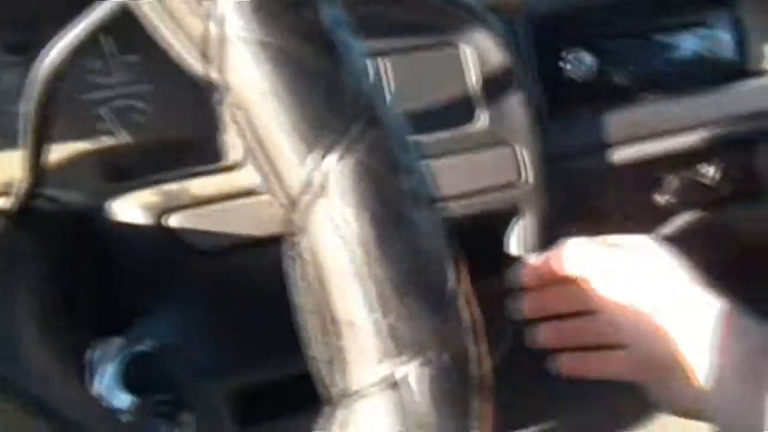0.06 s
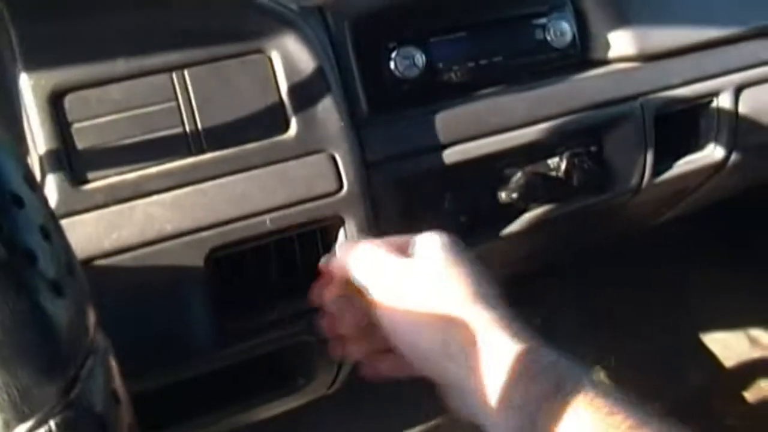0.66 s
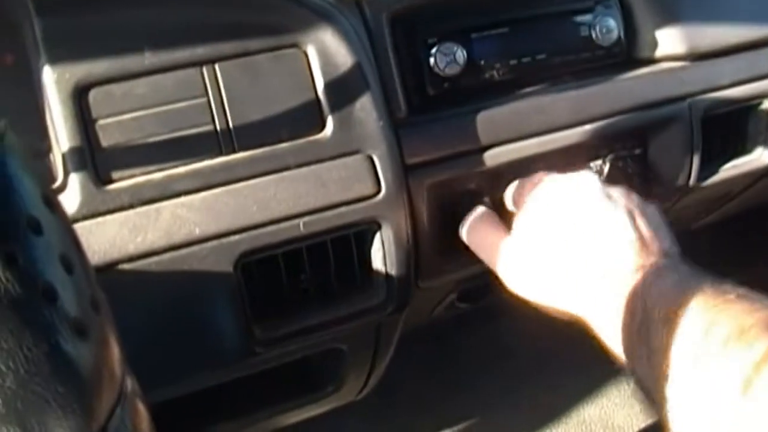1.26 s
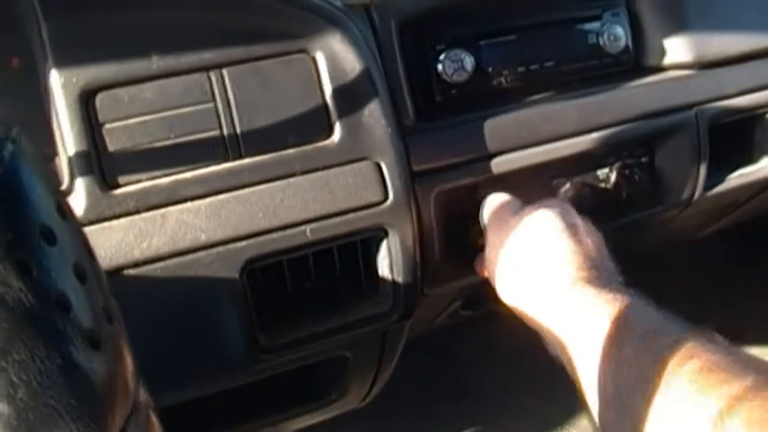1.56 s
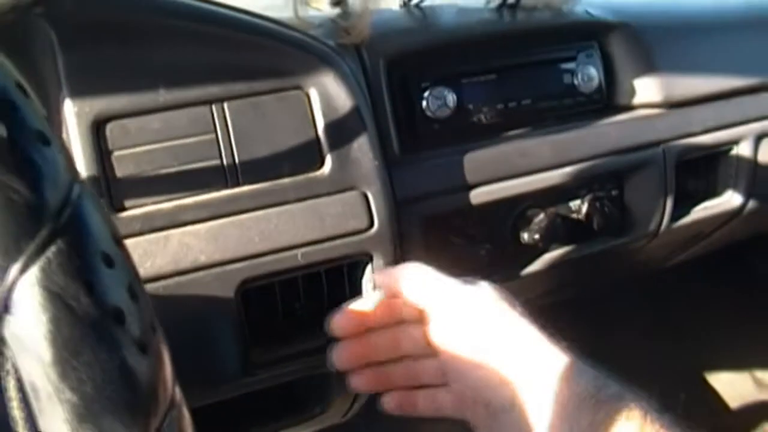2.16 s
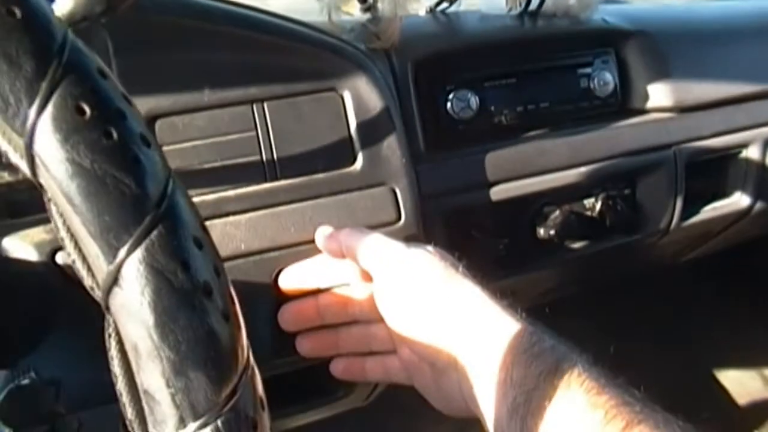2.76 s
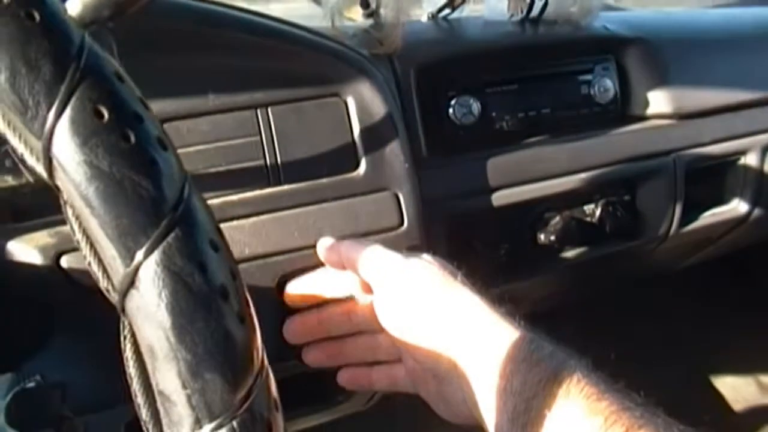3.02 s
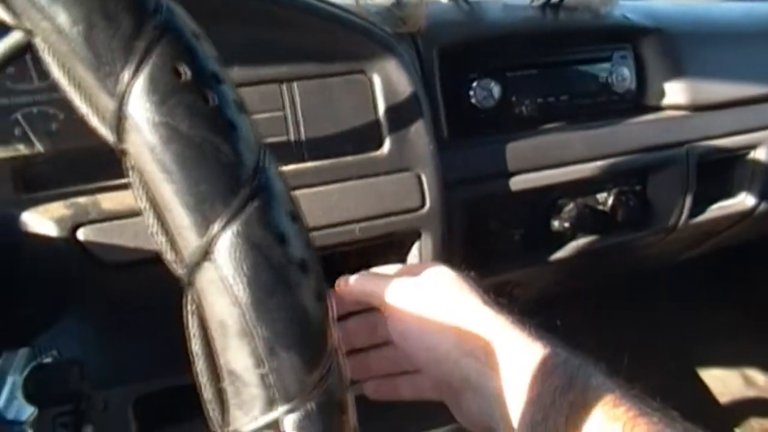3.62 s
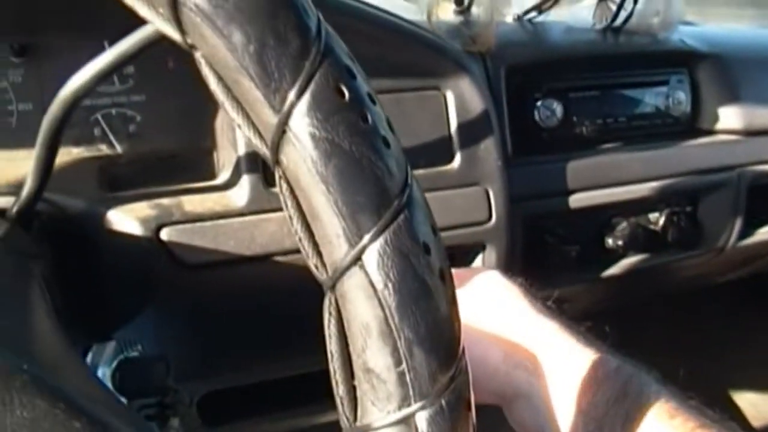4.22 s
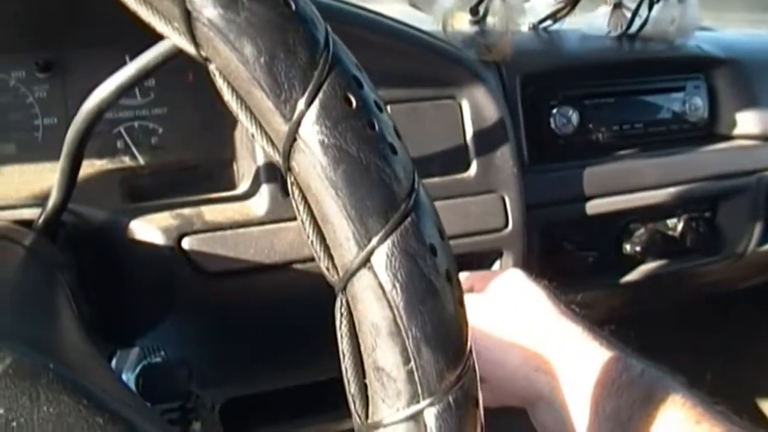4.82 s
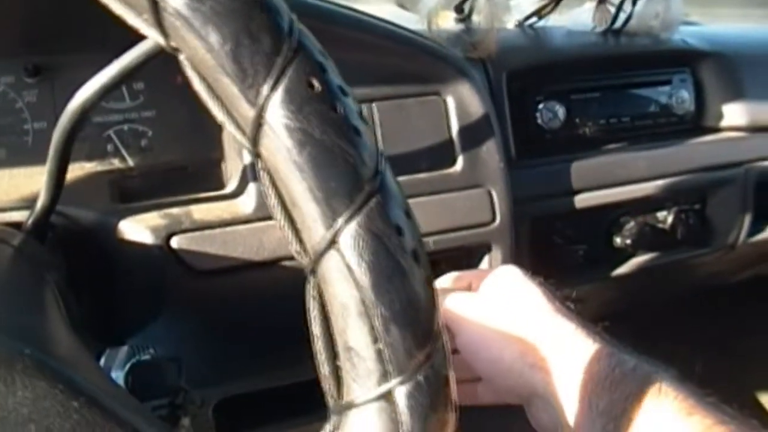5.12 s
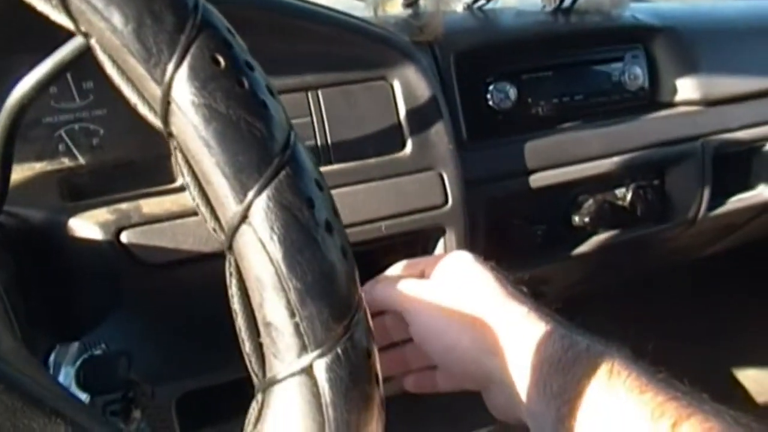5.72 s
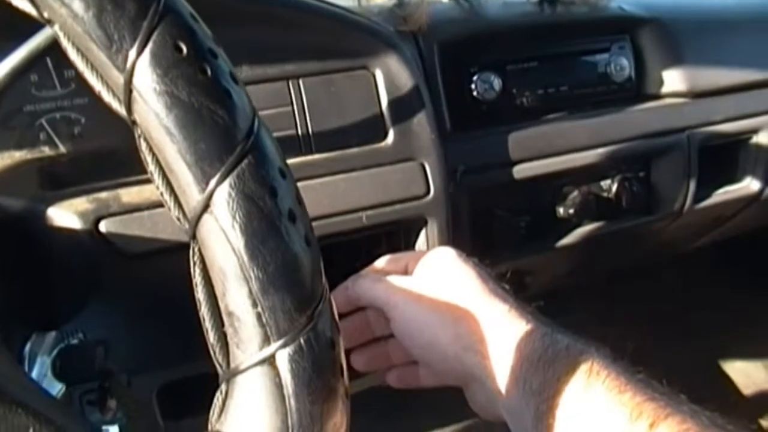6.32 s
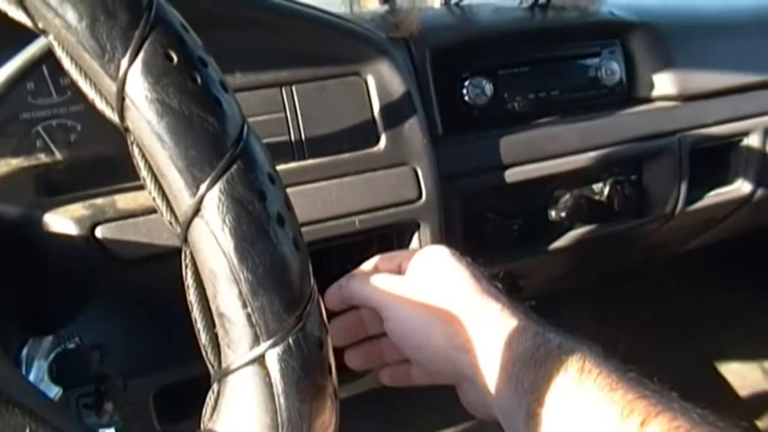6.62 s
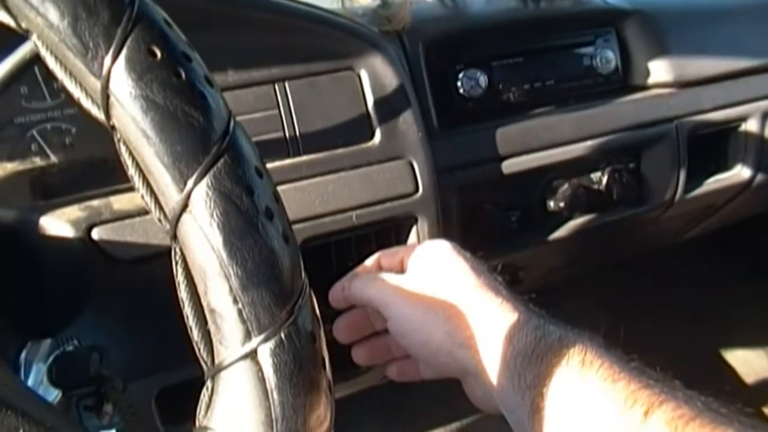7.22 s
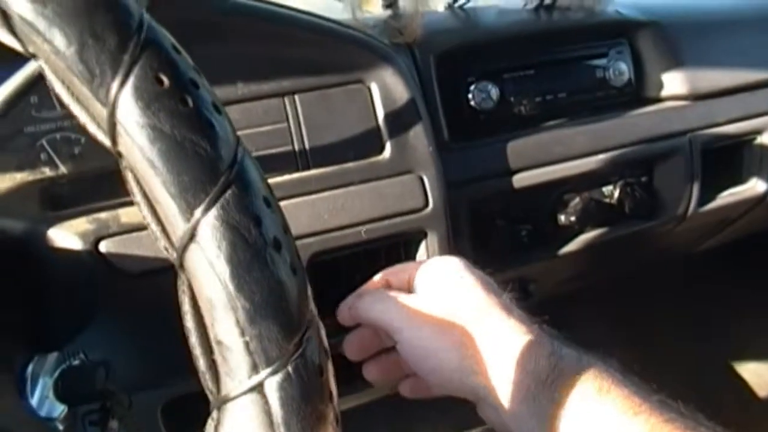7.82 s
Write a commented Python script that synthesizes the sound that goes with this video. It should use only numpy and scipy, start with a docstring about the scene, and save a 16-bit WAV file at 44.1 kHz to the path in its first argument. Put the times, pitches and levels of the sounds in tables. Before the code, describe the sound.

Inside an idling truck, a short air hiss and three quick plastic clicks start a dashboard blower, which blows steadily with faint whistles.

```python
"""In the cab of a pickup, from the driver's seat: the six-cylinder engine idles with a drone, a rumble
and one soft chuff per cycle. The heater's mode knob is turned and air hisses through a vacuum valve.
Then the fan switch clicks up three steps, and the blower spins up and rushes through the dashboard
ducts, which throb and whistle. Its electrical load pulls the idle down a little."""
import sys
import numpy as np
from scipy import signal
from scipy.fft import rfft, irfft, next_fast_len
from scipy.io import wavfile
from scipy.ndimage import uniform_filter1d, minimum_filter1d

SR = 44100
rng = np.random.default_rng(int(sys.argv[2]) if len(sys.argv) > 2 else 0)


def wrap_up_sound(samples):
    """Save the sound to the file named by the first command line argument, as 16-bit audio."""
    columns = np.atleast_2d(samples).T
    # keep every value between -1 and 1, then stretch to whole-number steps
    tamed = np.clip(columns, -1, 1)
    steps = np.round(tamed * 32767).astype(np.int16)
    wavfile.write(sys.argv[1], SR, steps)


N = 347065
TIME = np.arange(N) / SR
FFT_SIZE = next_fast_len(N + 4096)
FREQ = np.maximum(np.arange(FFT_SIZE // 2 + 1) * SR / FFT_SIZE, 1)

# how the firing tone booms with the listener's place in the cab, before scaling: time_s, swing_db
FIRING_BOOM = [(0, -2.5), (0.8, 2.5), (1.85, -2), (2.15, -2), (3.25, -12.5), (3.5, 6.5), (4.3, -1.5),
               (4.65, 1), (5.9, -6), (6.9, 4.5), (7.87, -1)]
# weaker engine tones: waves_per_cycle, level_db
ENGINE_TONES = [(3, -33.5), (5, -35.5), (10, -40.5), (12, -44), (15, -30), (17, -40.5), (18, -28),
                (20, -31.5), (27, -33.5), (56, -39), (60, -42.5)]
# engine rumble: pitch_hz, level_db_per_hz
RUMBLE_SPECTRUM = [(15, -68), (28, -41), (60, -45.5), (115, -44.5), (200, -49.5), (400, -55.5),
                   (700, -56.5), (1100, -60.5), (1700, -64), (2500, -71.5), (3300, -75.5), (5500, -77),
                   (8000, -79), (9000, -78.5), (16000, -84)]
# panels that ring with the engine: pitch_hz, width_hz, boost_db
PANEL_RESONANCES = [(177, 38, 1), (234, 6.1, 6), (372, 45, 4.5), (478, 45, 4.5), (610, 24, 1), (714, 25, 3),
                    (983, 12, 6), (1330, 31, 1), (2405, 90, 3), (3180, 90, 2.5), (3520, 350, -1.5),
                    (7570, 200, 5.5)]
# exhaust leak when fully open: pitch_hz, level_db_per_hz
CHUFF_SPECTRUM = [(400, -82), (900, -63.5), (1800, -57), (2500, -62.5), (3500, -70), (6000, -72.3),
                  (9000, -85.5), (16000, -100)]
# the leaking valve over one cycle: share_of_cycle, share_open
LEAK_OPENING = [(.11, .03), (.155, .82), (.31, .76), (.41, .1), (.6, .03)]
# faint hums of belt-driven parts: waves_per_cycle, level_db
BELT_HUMS = [(40.3, -34.5), (59.4, -47), (144.8, -48)]
# the clearest belt hum: time_s, level_db
CLEAR_HUM_LEVELS = [(0, -38), (.35, -37), (.55, -33), (1.05, -31.5), (1.35, -41), (1.65, -41), (1.9, -35),
                    (7.87, -35.5)]

# steps of the fan switch: start_s, added_share_of_full_speed
FAN_STEPS = [(1.752, .3), (1.83, .22), (1.92, .28)]
# duct roar, vent jet and grille hiss at full fan speed: pitch_hz, level_db_per_hz
ROAR_SPECTRUM = [(20, -53.5), (55, -37.5), (80, -40), (115, -39.5), (200, -39.5), (260, -41.5),
                 (330, -42.5), (400, -47.5), (700, -58.5), (1500, -96)]
JET_SPECTRUM = [(200, -59.5), (450, -53.5), (800, -54.5), (1100, -55), (1400, -57.5), (1900, -64.5),
                (2600, -63), (2950, -68.5), (4500, -74.5), (8000, -110)]
HISS_SPECTRUM = [(1500, -86.5), (3500, -68.5), (5000, -71), (6500, -71), (8000, -74.5), (9500, -86),
                 (12000, -134), (16000, -102)]
# air ringing in the cab and in the ducts: pitch_hz, width_hz, boost_db
CAB_RESONANCES = [(121, 37, 5), (220, 17, -5), (230.4, 23, 4.5), (256.5, 23, 2.5), (310, 45, 2.5),
                  (390, 18, -5.5)]
DUCT_RESONANCES = [(535, 28, -17.5), (609, 46, 6.5), (764, 56, 7.5), (874, 31, 5), (924, 40, -2),
                   (1008, 107, 5.5), (1655, 19, 9), (1993, 160, 6), (2200, 70, -1), (2387, 56, 7.5),
                   (2600, 62, 4), (3160, 52, 7.5), (3260, 55, 8)]
# the vent's strength as a hand moves in front of it, before scaling: time_s, swing_db
VENT_SWING = [(2.05, -1.5), (2.12, 1.4), (2.2, 0.9), (2.38, 2.3), (2.62, 0.1), (2.82, 0.2), (3.0, 1.9),
              (3.25, -1.0), (3.47, 1.5), (3.7, 1.3), (4.0, 1.0), (4.45, -1.2), (4.55, 0.9), (4.72, 0),
              (4.96, -0.9), (5.16, 1.8), (5.3, -0.6), (5.64, -0.3), (5.74, -1.5), (5.88, 0.2), (6.04, -0.2),
              (6.15, 2.2), (6.31, -0.9), (6.6, 0), (6.84, -1.1), (7.1, -0.2), (7.38, -0.1), (7.55, 0.3),
              (7.72, 0), (7.87, 0.7)]
# low throb in the ducts: time_s, level_db
THROB_LEVELS = [(2.0, -34), (2.3, -22), (2.85, -23), (3.05, -33), (3.45, -31), (3.8, -22), (4.3, -20),
                (5.3, -19), (6.05, -20.5), (6.4, -24), (6.75, -23), (7.05, -33), (7.4, -24), (7.87, -32)]
# the two notes of that throb: pitch_hz, width_hz, offset_db
THROB_NOTES = [(236, 14, -5.5), (263, 16, -2.2)]
# fan wheel and motor at full speed: pitch_hz, width_hz, level_db, spin_up_extra_db
MOTOR_NOTES = [(265.6, 5.5, -30.5, -11.5), (2350, 55, -44, 9.5)]
# the vent's two whistles: pitch_hz, width_hz
LOW_WHISTLE, HIGH_WHISTLE = (1621, 21), (2755, 32)
# how loud they are: time_s, low_whistle_db, high_whistle_db
VENT_WHISTLE_LEVELS = [(1.9, -90, -90), (2.2, -46, -40), (2.4, -32, -41), (3.2, -33.5, -44),
                       (3.5, -32.5, -42), (3.9, -34, -36), (4.2, -37, -43), (5.0, -37, -48),
                       (5.4, -40, -48), (5.9, -34.5, -52), (6.4, -39, -54), (7.87, -36, -54)]
# puffs of air that hit the microphone: peak_s, half_length_s, level_db
AIR_PUFFS = [(2.13, 0.04, -12), (3.09, 0.12, -16), (4.048, 0.087, -16.5), (6.01, 0.058, -15),
             (7.03, 0.054, -16.5)]
# tone colour of wind on the microphone: pitch_hz, relative_db
WIND_SPECTRUM = [(30, -21.5), (70, 9), (110, 16.5), (160, 4), (300, -23), (1000, -62)]

# plastic contacts of switch and vent: start_s, gain_db, fade_60db_s, dull_above_hz, ring_hz
CONTACTS = [(.127, -26, 0.023, 3500, 4180), (1.707, -27, .05, 5000, 3700), (1.747, -19, .04, 2500, 3500),
            (1.7505, -6, .04, 2200, 2750), (1.7525, -4.8, 0.04, 12000, 7300),
            (1.7535, -7.5, 0.055, 1200, 1760), (1.755, -6.8, 0.064, 2400, 3100),
            (1.8255, -22, 0.02, 4000, 4100), (1.829, 2, 0.04, 450, 1700), (1.832, -12.5, .06, 1300, 3100),
            (1.839, -15, 0.06, 5000, 4700), (1.9177, -19, 0.046, 6000, 4400),
            (1.9212, -2.8, .04, 700, 1690), (1.926, -19, .035, 5000, 5400), (1.929, 0, 0.035, 450, 748),
            (1.9425, -19, 0.03, 4000, 3550), (2.874, -14, 0.02, 2300, 3830),
            (5.878, -22, 0.015, 4500, 6750)]
# tone colour of the dashboard plastic: pitch_hz, gain_db
PLASTIC_SPECTRUM = [(200, -4), (700, -2.5), (1300, -2.5), (1800, -6.5), (3000, 1), (4600, -1.5), (7500, 1),
                    (9500, 7.5), (16000, -2.5)]
# where that plastic rings: pitch_hz, width_hz, boost_db
PLASTIC_RESONANCES = [(1777, 130, 9.5), (2200, 120, 8), (2630, 140, 4.5), (3020, 180, -4), (4080, 120, 6),
                      (4600, 280, -9), (5170, 480, 7), (7070, 1900, -1.5), (3600, 230, 0.5),
                      (9200, 500, -5)]
# hiss of the vacuum valve, before its gain: pitch_hz, level_db_per_hz
VALVE_SPECTRUM = [(1500, -84), (3500, -87), (6000, -83), (8500, -81), (9400, -78), (11000, -61),
                  (16000, -87.5)]
# whistling peaks in that hiss: pitch_hz, width_hz, boost_db
VALVE_RESONANCES = [(4300, 700, 5), (6150, 250, 6), (7600, 600, 4), (8350, 250, 3)]

# how much the two sides differ: pitch_hz, side_minus_middle_db
STEREO_WIDTH = [(30, -18.5), (70, -23.5), (130, -34.5), (250, -22.5), (500, -20), (1000, -18),
                (2000, -11.5), (4000, -9), (6500, -11), (9000, -1), (16000, 2.5)]
# the two microphone openings are unequal: pitch_hz, left_minus_right_db
MIC_BALANCE = [(35, 2), (70, 0.8), (130, 0.35), (500, -0.25), (2000, -.5), (6000, -1.4), (7800, -1),
               (9200, -14), (11300, 8.5), (14500, -8)]
# sound cancels in the openings in the treble: pitch_hz, width_hz, gain_db
MIC_NOTCH = [(11820, 3820, -43)]


def engine_cycles(idle_hz=37.7, loaded_hz=37.48, sag_hz=1.35, sag_at_s=2.4, sag_half_s=.3):
    """Count engine cycles (two turns, six firings). The blower drags the idle down; it mostly recovers."""
    steady_hz = np.where(TIME < sag_at_s - sag_half_s, idle_hz, loaded_hz)
    firing_hz = steady_hz - sag_hz * bump(sag_at_s, sag_half_s)
    return np.cumsum(firing_hz) / SR / 6


def engine_drone(cycle, firing_db=-19.5, boom_share=0.84, waver_db=2.5, slip_rad=0.13):
    """Six firings a cycle make a low tone; unequal, unsteady cylinders add weaker ones."""
    boom_db, = time_curves(FIRING_BOOM)
    tones = from_db(firing_db + boom_share * boom_db) * np.sin(2 * np.pi * 6 * cycle)
    for waves_per_cycle, db in ENGINE_TONES:
        phase = 2 * np.pi * (waves_per_cycle * cycle + rng.random()) + slip_rad * drift(23)
        tones += from_db(db + waver_db * drift(6.1)) * np.sin(phase)
    return np.sqrt(2) * tones


def engine_rumble(uneven_db=0.5):
    """The noise of burning fuel and moving valves comes through the ringing panels."""
    rumble = noise(spectrum(RUMBLE_SPECTRUM) + peaks(PANEL_RESONANCES))
    return rumble * from_db(uneven_db * drift(22.5))


def exhaust_chuff(cycle, uneven_db=1.1):
    """One cylinder leaks a puff of exhaust while its valve is open."""
    opening = np.interp(cycle % 1, *np.transpose(LEAK_OPENING))
    exhaust = noise(spectrum(CHUFF_SPECTRUM) + peaks(PANEL_RESONANCES))
    return exhaust * opening * from_db(-uneven_db * drift(4.3))


def fan_speed(lag_s=.17):
    """Share of full speed: the wheel turns slowly at first and catches up after each switch step."""
    return 1 - sum(step * np.exp(-since(start_s) / lag_s) for start_s, step in FAN_STEPS)


def blower_rush(speed, eddy_db=1.13, flutter_db=1.28):
    """Duct roar, vent jet and grille hiss grow with fan speed; swirling air makes them flutter."""
    swing_db, = time_curves(VENT_SWING)
    roar = noise(spectrum(ROAR_SPECTRUM) + peaks(CAB_RESONANCES))
    roar *= speed ** 1.25 * from_db(.25 * swing_db + eddy_db * drift(12))
    jet = noise(spectrum(JET_SPECTRUM) + peaks(DUCT_RESONANCES), wider_db=1.5)
    jet *= speed ** 1.6 * from_db(1.4 * swing_db)
    hiss = noise(spectrum(HISS_SPECTRUM), wider_db=2)
    hiss *= speed ** 4.5 * from_db(1.2 * swing_db)
    return roar + (jet + hiss) * from_db(flutter_db * drift(21))


def duct_throb(speed):
    """Moving air sounds two low notes in the ducts, which beat against each other unevenly."""
    level_db, = time_curves(THROB_LEVELS)
    return speed ** 2 * sum(from_db(level_db + offset_db) * noisy_note(np.full(N, hz), width_hz)
                            for hz, width_hz, offset_db in THROB_NOTES)


def fan_whine(speed, waver_share=0.00307, settle_s=1.6):
    """The fan's hum and whine climb with its speed and waver; their balance settles after the spin-up."""
    last_step_s = FAN_STEPS[-1][0]
    unsettled = np.exp(-since(last_step_s) / settle_s)
    turning = speed * (1 + waver_share * drift(5.03))
    return speed ** 4.5 * sum(from_db(db + extra_db * unsettled) * noisy_note(hz * turning, width_hz)
                              for hz, width_hz, db, extra_db in MOTOR_NOTES)


def vent_whistles(speed):
    """Air sings at the vent's slats; the ducts hold the pitch, so fan speed bends it only a little."""
    bend = speed ** .15
    whistles = zip((LOW_WHISTLE, HIGH_WHISTLE), time_curves(VENT_WHISTLE_LEVELS))
    return sum(from_db(db) * noisy_note(hz * bend, width_hz) for (hz, width_hz), db in whistles)


def plastic_clicks(grit_db=2.5, tail_db=-24, tail_fade_s=0.33, ring_gain=4, ring_sharpness=22):
    """Each contact sets off a brief rattle in the plastic, followed by the cab's short echo."""
    clicks = np.zeros((2, N))
    age = np.arange(SR // 4) / SR
    for start_s, db, fade_s, dull_above_hz, ring_hz in CONTACTS:
        middle, side, grit = rng.standard_normal((3, len(age)))
        roughness = from_db(grit_db * (np.repeat(grit, 20)[:len(age)] + 1.5))
        rattle = (middle + 0.2 * side * np.array([[1], [-1]])) * roughness
        fade = from_db(-60 * age / fade_s) + from_db(tail_db - 60 * age / tail_fade_s)
        softness = np.exp(-2 * np.pi * dull_above_hz / SR)
        tap = signal.lfilter([1 - softness], [1, -softness], rattle * fade)
        ring = signal.lfilter(*signal.iirpeak(ring_hz, ring_sharpness, SR), tap)
        start = round(start_s * SR)
        clicks[:, start:start + len(age)] += from_db(db) * (tap + ring_gain * ring)
    return resonate(clicks, spectrum(PLASTIC_SPECTRUM) + peaks(PLASTIC_RESONANCES))


def vacuum_valve(opens_s=0.89, rise_s=0.25, flaps_done_s=1.69, fall_db_per_s=30, hiss_gain_db=6,
                 start_hz=4600, end_hz=4030, settle_s=.48, whistle_db=-44.5, chirp_db=5):
    """Air hisses until the heater flaps have moved; a whistle at the valve's lip sinks with pressure."""
    age = since(opens_s)
    flow = np.minimum(age / rise_s, 1) * from_db(-fall_db_per_s * since(flaps_done_s))
    hiss = noise(spectrum(VALVE_SPECTRUM) + peaks(VALVE_RESONANCES), wider_db=-16)
    pitch_hz = end_hz + (start_hz - end_hz) * np.exp(-age / settle_s)
    level_db = whistle_db + chirp_db * bump(peak_s=1.15, half_length_s=.05)  # sings out as flow builds
    whistle = from_db(level_db) * noisy_note(pitch_hz, width_hz=170)
    return from_db(hiss_gain_db) * flow * hiss + flow ** 4 * whistle


def belt_hums(cycle, clear_waves_per_cycle=81.3, waver_db=0.5, slip_rad=0.26):
    """Belt-driven parts turn in step with the engine and waver; the clearest hum swells and fades."""
    clear_db, = time_curves(CLEAR_HUM_LEVELS)
    hums = from_db(clear_db) * np.sin(2 * np.pi * clear_waves_per_cycle * cycle + slip_rad * drift(5.5))
    for waves_per_cycle, db in BELT_HUMS:
        gain = from_db(db - waver_db * drift(6.2))
        hums += gain * np.sin(2 * np.pi * waves_per_cycle * cycle + slip_rad * drift(12))
    return np.sqrt(2) * hums


def wind_on_microphone(speed, draught_db=-32, gust_db=3):
    """Low puffs of air, and a light draught that each microphone opening feels on its own."""
    wind = noise(spectrum(WIND_SPECTRUM))
    puffs = sum(from_db(db) * bump(peak_s, half_length_s) for peak_s, half_length_s, db in AIR_PUFFS)
    draught = resonate(rng.standard_normal((2, N)), spectrum(WIND_SPECTRUM))
    gusts = speed ** 2 * from_db(draught_db + gust_db * drift(3.6))
    return wind / wind.std() * puffs + draught / draught.std() * gusts


def from_db(db):
    """Turn decibels into a gain."""
    return 10 ** (np.asarray(db) / 20)


def since(start_s):
    """Seconds since a moment, zero before it."""
    return np.maximum(TIME - start_s, 0)


def bump(peak_s, half_length_s):
    """A smooth rise to 1 and back."""
    return np.exp(-((TIME - peak_s) / half_length_s) ** 2)


def time_curves(rows):
    """One curve for each column after the time, joined by straight lines."""
    times_s, *columns = np.transpose(rows)
    return [np.interp(TIME, times_s, column) for column in columns]


def spectrum(points):
    """Join (pitch, dB) points into a level for every frequency."""
    hz, db = np.transpose(points)
    return np.interp(np.log(FREQ), np.log(hz), db)


def peaks(resonances):
    """The dB that resonances add or take away at each frequency."""
    return sum(db / (1 + (2 * (FREQ - hz) / width_hz) ** 2) for hz, width_hz, db in resonances)


def drift(rate_hz):
    """A smooth random wander, typically about 1 in size."""
    step, warm_up = 40, 2000
    memory = np.exp(-2 * np.pi * step * rate_hz / SR)
    kicks = rng.standard_normal(N // step + warm_up + 2)
    slow = signal.lfilter([1], [1, -2 * memory, memory ** 2], kicks)[warm_up:]
    return np.interp(np.arange(N) / step, np.arange(len(slow)), slow / slow.std())


def noisy_note(pitch_hz, width_hz):
    """A breathy note that follows a pitch curve."""
    phase = 2 * np.pi * np.cumsum(pitch_hz) / SR
    return drift(width_hz) * np.cos(phase) + drift(width_hz) * np.sin(phase)


def noise(level_db_per_hz, wider_db=0):
    """Stereo noise with a given spectrum; the two sides differ more in the treble."""
    middle, side = rfft(rng.standard_normal((2, FFT_SIZE)))
    pair = middle + side * from_db(spectrum(STEREO_WIDTH) + wider_db) * np.array([[1], [-1]])
    return irfft(pair * from_db(level_db_per_hz) * np.sqrt(SR / 2), FFT_SIZE)[:, :N]


def resonate(sound, gain_db):
    """Filter a sound so that a body rings only after it is struck (minimum phase)."""
    cepstrum = irfft(np.log(from_db(gain_db)), FFT_SIZE)
    cepstrum[1:FFT_SIZE // 2] *= 2  # move the ringing from before the strike to after it
    cepstrum[FFT_SIZE // 2 + 1:] = 0
    return irfft(rfft(sound, FFT_SIZE) * np.exp(rfft(cepstrum)), FFT_SIZE)[..., :N]


def scene():
    """Add up the engine, the heater and the clicks."""
    cycle, speed = engine_cycles(), fan_speed()
    engine = engine_drone(cycle) + belt_hums(cycle) + engine_rumble() + exhaust_chuff(cycle)
    fan = blower_rush(speed) + duct_throb(speed) + fan_whine(speed) + vent_whistles(speed)
    return engine + fan + wind_on_microphone(speed) + vacuum_valve() + plastic_clicks()


def record(dry):
    """Two unequal microphone openings, a fast limiter on the highest peaks and a steep treble cut."""
    cutoff_hz, limiter_samples = 15800, 89
    coloured = np.array([resonate(channel, peaks(MIC_NOTCH) + sign * spectrum(MIC_BALANCE) / 2)
                         for channel, sign in zip(dry, (1, -1))])
    safe_gain = 1 / np.maximum(np.abs(coloured).max(axis=0), 1)
    smooth_gain = uniform_filter1d(minimum_filter1d(safe_gain, limiter_samples), limiter_samples)
    treble_cut = signal.ellip(10, .1, 80, cutoff_hz, fs=SR, output="sos")
    return signal.sosfilt(treble_cut, coloured * smooth_gain)


dry = scene()
out = record(dry)
wrap_up_sound(out)
```